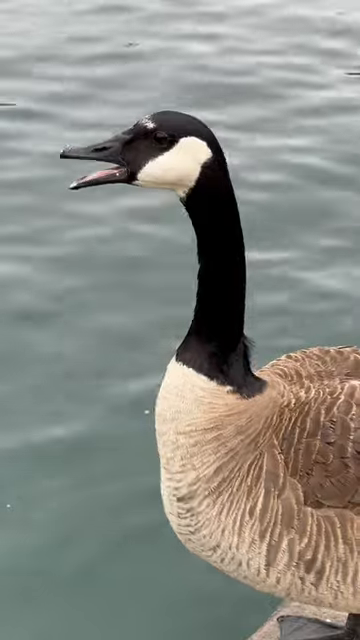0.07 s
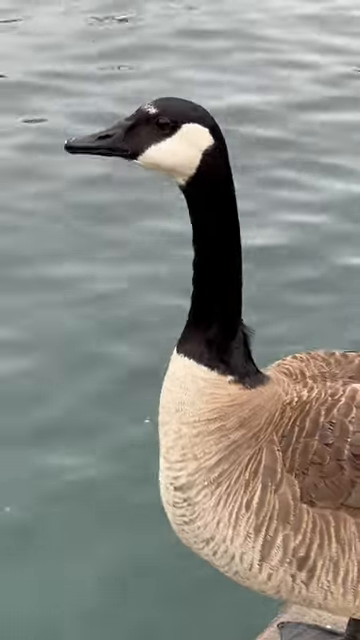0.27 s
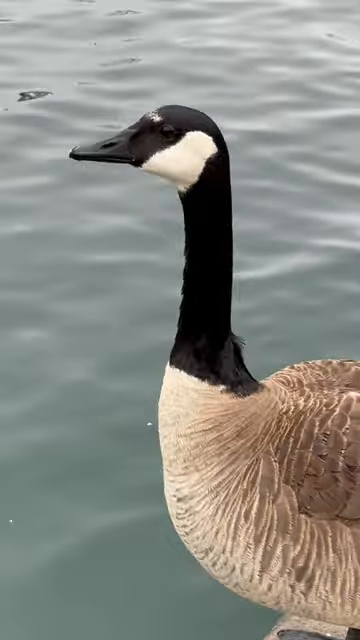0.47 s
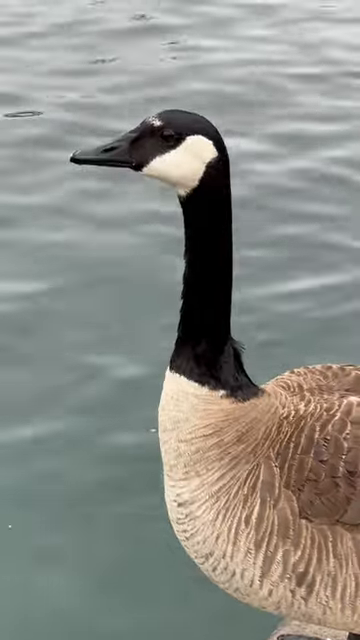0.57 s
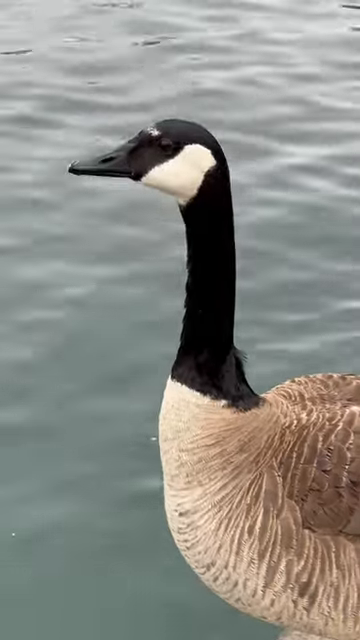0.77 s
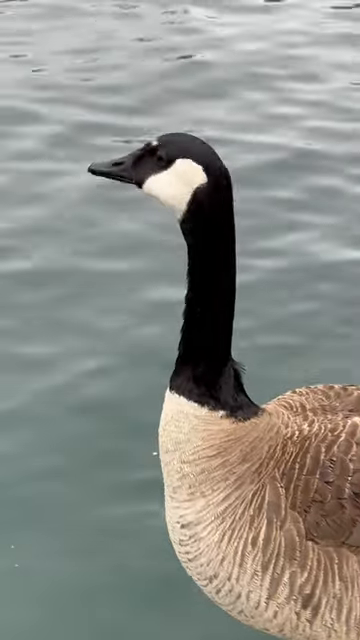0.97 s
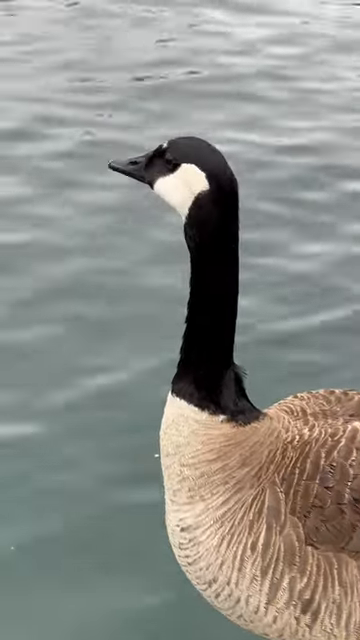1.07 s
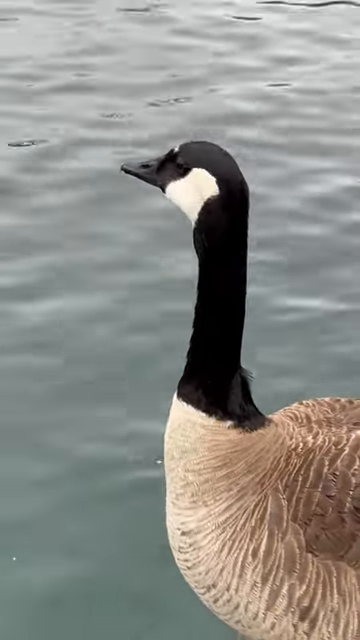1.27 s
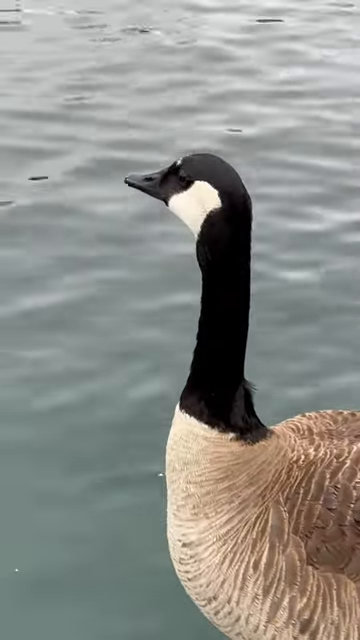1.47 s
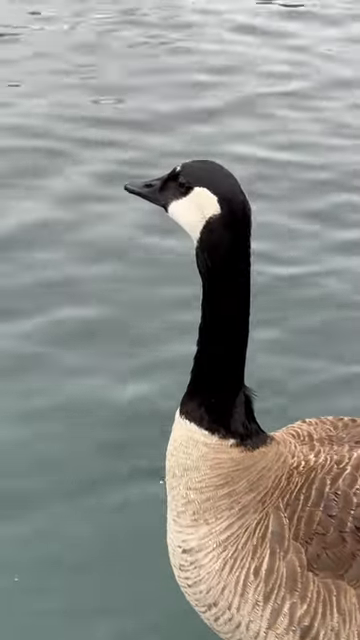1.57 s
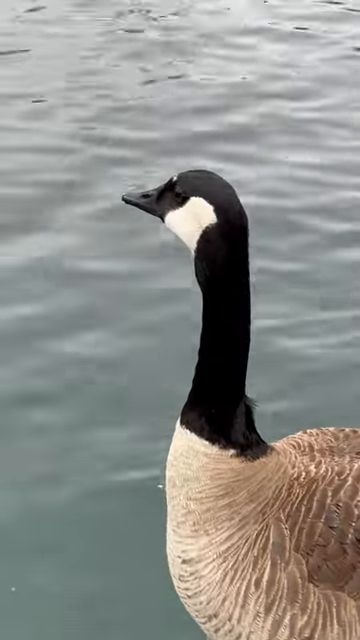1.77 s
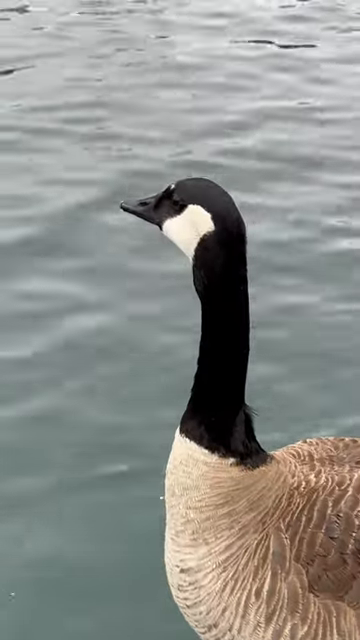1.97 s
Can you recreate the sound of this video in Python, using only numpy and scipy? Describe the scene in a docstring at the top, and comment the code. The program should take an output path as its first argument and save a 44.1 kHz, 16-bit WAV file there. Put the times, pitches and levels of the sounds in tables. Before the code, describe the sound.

Abrupt start inside a loud, buzzing two-toned goose honk that falls and stops within a third of a second, then quiet water, a faint low hum, tiny drips and five small rising-and-falling peeps, outdoors, close microphone.

```python
"""A goose's loud honk, already under way: a large bird close by at a pond's edge, in nearly central stereo.
The two sides of its voice box sound at two pitches, as coupled oscillators driving a resonant windpipe.
Filtered noise makes lapping water and far traffic rumble; a low hum of wandering pitch swells and sags.
A faint whistling tone, a splash and a ringing are brief bands of noise; small drips are short decaying tones.
Five arched peeps are built from partials and wheezing noise."""
import sys
import numpy as np
from scipy import signal
from scipy.fft import rfft, irfft, next_fast_len
from scipy.io import wavfile
from scipy.ndimage import uniform_filter1d

SR = 44100
rng = np.random.default_rng(int(sys.argv[2]) if len(sys.argv) > 2 else 0)


def transcribe(signal):
    """Save signal, clipped to [-1, 1], as a 16-bit WAV file at the path in sys.argv[1]."""
    frames = np.atleast_2d(signal).T
    limited = np.clip(frames, -1, 1)
    pcm = np.round(limited * 32767).astype(np.int16)
    wavfile.write(sys.argv[1], SR, pcm)


def convert_level_to_amplitude(level_db):
    """Map a level in decibels to its linear amplitude factor."""
    exponent = np.asarray(level_db, float) / 20
    return 10 ** exponent


N = 88420  # samples, about two seconds

# Course of the honk: time_s, low_side_hz, high_side_hz, level_db (gain on tones and voice), roughness (0 to 1)
HONK_COURSE = [(.03, 456, 590, -16, .35), (.07, 453, 586, -15, .4), (.12, 454, 581, -13, .25),
               (.17, 455, 578, -12, .2), (.22, 450, 572, -12, .2), (.245, 437, 550, -14, .2),
               (.262, 416, 522, -19, .2), (.28, 385, 490, -29, .1), (.3, 345, 440, -38, .1),
               (.32, 325, 420, -70, .1)]
# Clear tones of the coupled sides: (multiple of low pitch, multiple of high pitch): level_db, before flutter
SIDE_TONES = {(1, 0): -4, (0, 1): -9.5, (2, 0): -2.1, (1, 1): -8, (0, 2): -10, (-1, 1): -19.5, (-1, 2): -18, (-2, 3): -13.5, (-1, 3): -14.5, (3, 0): -18, (-2, 4): -9.5, (2, 1): -11.5, (-2, 5): -18.5}
# Windpipe resonances: centre_hz, width_hz, gain_db
WINDPIPE = [(510, 98, -9), (1003, 193, 1.5), (1160, 242, -1), (1430, 240, -6.5), (1980, 130, -9.5),
            (2319, 63, -7), (2843, 138, -12.5), (3250, 130, -15), (3790, 128, -15.5), (4230, 66, -16),
            (4630, 85, -15.5), (5520, 780, -25.5), (6900, 790, -47), (8800, 2200, -52.5)]
# Diffuse echo from banks and water: frequency_hz, t60_s
SHORE_DECAY = [(200, 0.47), (2000, 0.084), (8000, 0.078)]
# Lapping of the water over time: time_s, level_db (before a fixed 4 dB lift)
WATER_COURSE = [(.3, -42), (.45, -40), (.7, -41), (.95, -41), (1.15, -43), (1.5, -40.5), (2, -41)]
# Colour of the water's wash: frequency_hz, relative_db
WASH_COLOUR = [(90, -25), (150, -4), (230, -3), (400, -8.5), (900, -12), (1850, -21.5), (3400, -28),
               (4900, -39.5), (6000, -38.5), (7600, -34.5), (10300, -41), (11200, -90)]
# Far traffic over time: time_s, level_db
TRAFFIC_COURSE = [(.04, -32), (.4, -36.5), (.8, -36.5), (1.1, -39.5), (1.3, -37), (1.6, -36.5), (2, -40)]
# Colour of the far traffic: frequency_hz, relative_db
TRAFFIC_COLOUR = [(20, -46.5), (34, -9), (70, -2), (87, 2.5), (107, 4), (124, -7), (144, -1), (178, -10.5),
                  (220, -7), (290, -23), (480, -120)]
# Course of the hum: time_s, pitch_hz, level_db (of its main tone)
HUM_COURSE = [(0.178, 230, -40.5), (.28, 229.5, -36), (.4, 227.6, -32.5), (0.516, 231.5, -30.5),
              (.55, 210.8, -36.5), (.59, 229.7, -38.5), (.7, 216.4, -44.5)]
# Brief bands of noise (a faint whistling tone, a splash, a ringing at the last peep):
# full_from_s, length_s (half held, a third for each fade), level_db, centre_hz
BRIEF_BANDS = [(0.456, 0.041, -49.5, 1830), (0.943, 0.14, -43, 1560), (1.852, 0.1, -48.5, 1707)]
# Bandwidth of each brief band: width (natural log of frequency ratio)
BRIEF_BAND_WIDTHS = [0.062, 0.54, 0.034]
# Small drips: start_s, peak_db, pitch_hz, cycles (the swell peaks after half of them)
DRIP_LIST = [(.659, -48, 8000, 5), (1.068, -48, 7400, 3), (1.473, -41, 10000, 3), (1.484, -44, 6100, 9),
             (1.638, -36, 8500, 2), (1.96, -37, 7500, 1.5), (1.975, -43, 9800, 6)]
# Pitch arch of each peep, one list per peep: time_s, pitch_hz
PEEP_ARCHES = [
    [(.738, 1250), (.77, 1740), (.80, 1557), (.845, 1175)],
    [(.985, 1039), (1.005, 1328), (1.02, 1658), (1.033, 2020), (1.066, 2047), (1.082, 1636), (1.1, 1330),
     (1.12, 1173)],
    [(1.22, 950), (1.26, 1450), (1.278, 1706), (1.295, 1745), (1.312, 1430), (1.37, 944)],
    [(1.48, 925), (1.52, 1568), (1.54, 1840), (1.58, 1600), (1.592, 1636), (1.635, 1090)],
    [(1.765, 868), (1.8, 1420), (1.818, 1660), (1.834, 1706), (1.85, 1460), (1.89, 895)],
]
# Strength of each peep's parts, before throat and beak colouring:
# fundamental_db, second_db, fourth_db, fifth_and_sixth_db, wheeze_db (at the top of the arch)
PEEP_LEVELS = [(-49, -58, -76, -74, -57), (-42, -54, -60, -78, -56), (-39, -53, -50, -70, -57),
               (-38, -55, -51, -49, -48), (-41, -50, -55, -51, -48)]
# Throat colour on the first two partials: frequency_hz, gain_db
THROAT_COLOUR = [(1480, -13), (1620, 1.5), (1780, 7), (1900, -8), (2020, 4), (2300, 2.5), (2600, 7),
                 (2950, 6), (3300, 6.5), (4100, 1.5)]
# Beak colour on the fourth to sixth partials: frequency_hz, gain_db
BEAK_COLOUR = [(5700, -40), (6300, -6), (7000, 0), (7800, -14), (8500, 0), (9200, -2), (10000, -30)]
# Colour of the peeps' wheeze: frequency_hz, relative_db
WHEEZE_COLOUR = [(5200, -40), (6200, -7), (7000, -2), (7700, -6), (8700, 0), (9600, -4), (10400, -30),
                 (11200, -120)]
# Side signal, relative to the middle: frequency_hz, level_db
SIDE_COLOUR = [(120, -40), (300, -19), (1700, -21), (2100, -60), (4300, -60), (4700, -2), (5300, -60),
               (6300, -50), (7000, -3), (11000, 0)]
# Colour of the hiss that is opposite in left and right: frequency_hz, relative_db
SHEEN_COLOUR = [(6800, -51), (7600, -8.5), (11000, 2.5), (15500, -11.5), (16000, -59.5)]


def unit(x):
    """Scales to an rms of 1."""
    return x / np.sqrt(np.mean(x ** 2) + 1e-20)


def along(points, hz):
    """Reads (Hz, value) points on a log frequency axis."""
    f, v = np.transpose(points)
    return np.interp(np.log(hz + 1), np.log(f + 1), v)


def curves(rows):
    """One value per sample for each column after the time."""
    s, *cols = np.transpose(rows)
    return [np.interp(np.arange(N) / SR, s, c) for c in cols]


def window(t0, t1, fade_s):
    """One inside the span, fading outside both ends."""
    return np.interp(np.arange(N) / SR, [t0 - fade_s, t0, t1, t1 + fade_s], [0, 1, 1, 0])


def wobble(rate):
    """A random curve joining normal-distributed knots, rate knots a second."""
    knots = int(N * rate / SR) + 2
    return np.interp(np.arange(N) * rate / SR, np.arange(knots), rng.standard_normal(knots))


def phase(hz):
    """Running phase in radians of a moving pitch."""
    return 2 * np.pi * np.cumsum(hz) / SR


def filtered(x, response):
    """Passes x through a complex response of frequency."""
    m = next_fast_len(N + SR // 2)
    return irfft(rfft(x, m) * response(np.fft.rfftfreq(m, 1 / SR)), m)[..., :N]


def rush(spectrum, patchy_db):
    """Coloured noise of rms 1, with random patches of gain in time and frequency."""
    z = signal.stft(rng.standard_normal(N), nperseg=512)[2]
    field = uniform_filter1d(uniform_filter1d(rng.standard_normal(z.shape), 5, 0), 10, 1)
    x = signal.istft(z * convert_level_to_amplitude(patchy_db * unit(field)), nperseg=512)[1][:N]
    return unit(filtered(x, lambda hz: convert_level_to_amplitude(along(spectrum, hz))))


def pulse_train(p, sharpness):
    """One smooth pulse per turn of phase, narrower as sharpness nears 1."""
    return (1 - sharpness ** 2) / (1 + sharpness ** 2 - 2 * sharpness * np.cos(p))


def windpipe(f):
    """Sum of resonances of alternating sign, under a steep upper limit."""
    total = 0
    for k, (centre, width, gain_db) in enumerate(WINDPIPE):
        resonance = 1j * f * width / (centre ** 2 - f ** 2 + 1j * f * width)
        total = total + (-1) ** k * convert_level_to_amplitude(gain_db) * resonance
    top_hz = 10400
    return total / (1 + (f / top_hz) ** 20)


def side_tones(a, b, rough, coupled):
    """Clear tones at sums and differences of the two pitches, as coupled oscillators make."""
    flutter_db, third_rise_db = 3.2, 16
    half_beat = .7  # every other beat is stronger
    total = np.zeros(N)
    for (m, n), level_db in SIDE_TONES.items():
        if (m, n) == (1, 0):
            remaining = 1
        elif (m, n) == (3, 0):
            remaining = convert_level_to_amplitude(third_rise_db * (1 - coupled))  # left ringing at the end
        else:
            remaining = coupled
        tone = np.sin(m * a + n * b + rng.uniform(0, 6.78))
        total += convert_level_to_amplitude(level_db + flutter_db * wobble(38.4)) * tone * remaining
    return total * (1 + half_beat * rough * np.cos((b - a) / 2))


def honk_voice(a, b, rough, coupled, closing_s):
    """Puffs of the low side, swayed by the high one, buzz and rasp through the windpipe."""
    low_sharpness, high_sharpness, pull_rad = .9, .2, .45
    pull = pull_rad * coupled * np.sin(b - a)
    pull = pull + pull_rad * rough * coupled * np.sin((b - a) / 2)
    puffs = pulse_train(a + pull, low_sharpness) * pulse_train(b, high_sharpness * coupled)
    clean = unit(filtered(puffs - puffs.mean(), windpipe))

    # the puffs scatter in the folded windpipe: only the phases of a noise tail are used
    smear_s, buzz_above_hz = .02, 1350
    t = np.arange(SR // 20) / SR
    scatter = rng.standard_normal(len(t)) * convert_level_to_amplitude(-60 * t / smear_s)
    smeared = unit(filtered(clean, lambda f: np.exp(1j * np.angle(rfft(scatter, 2 * len(f) - 1)))))
    smeared = filtered(smeared, lambda f: 1 / (1 + (buzz_above_hz / (f + 1)) ** 10))

    tail_db, pulses_stop_s = 10, .28
    tail = convert_level_to_amplitude(tail_db) * clean * window(-1, pulses_stop_s, closing_s)
    buzz = coupled * smeared + (1 - coupled) * tail
    air = unit(filtered(puffs ** 0.16 * rng.standard_normal(N), windpipe))
    buzz_db, rasp_db = -5, -12.5  # the rasp's level holds at a roughness of 0.25
    return convert_level_to_amplitude(buzz_db) * buzz + convert_level_to_amplitude(rasp_db) * np.sqrt(np.abs(rough)) * 2 * air


def honk():
    """The goose close by: two coupled sides give clear tones and puffs of air in the windpipe."""
    low_hz, high_hz, level_db, rough = curves(HONK_COURSE)
    high_stops_s, closing_s = .263, .015  # the high side stops first; the low side's pulses are left
    coupled = window(-1, high_stops_s, closing_s)
    jitter_hz = 5.5  # at full roughness
    a = phase(low_hz + jitter_hz * rough * wobble(150))
    b = phase(high_hz + jitter_hz * rough * wobble(150))
    tones = side_tones(a, b, rough, coupled)
    voice = honk_voice(a, b, rough, coupled, closing_s)

    # the treble dulls as the bill closes
    treble_above_hz, soften_db_per_s = 4870, 30
    treble = filtered(voice, lambda f: 1 / (1 + (treble_above_hz / (f + 1)) ** 8))
    lost = 1 - convert_level_to_amplitude(-soften_db_per_s * np.arange(N) / SR)
    return convert_level_to_amplitude(level_db) * (tones + voice - treble * lost)


def shore(x):
    """Diffuse answer of banks and water: a decaying noise tail, delayed by 300 samples."""
    hz, t, z = signal.stft(rng.standard_normal(SR // 2), SR, nperseg=256)
    decay = convert_level_to_amplitude(-60 * t / along(SHORE_DECAY, hz)[:, None])
    tail = signal.istft(z * decay, SR, nperseg=256)[1]
    return signal.fftconvolve(np.pad(x, (300, 0)), tail / np.linalg.norm(tail))[:N]


def water():
    """Lapping water: a patchy wash of coloured noise with a drifting level."""
    level_db, = curves(WATER_COURSE)
    return convert_level_to_amplitude(level_db + 4 + .8 * wobble(8)) * rush(WASH_COLOUR, patchy_db=1.3)


def rumble():
    """Far traffic: low coloured noise with a lumpy level."""
    level_db, = curves(TRAFFIC_COURSE)
    return convert_level_to_amplitude(level_db + 0.44 * wobble(14.0)) * rush(TRAFFIC_COLOUR, patchy_db=0.0)


def hum():
    """A low hum of wandering pitch, with tones at half and one and a half times that pitch."""
    hz, level_db = curves(HUM_COURSE)
    under_db, over_db = -7, -12.5
    p = phase(hz)
    tone = np.sin(p) + convert_level_to_amplitude(under_db) * np.sin(p / 2) + convert_level_to_amplitude(over_db) * np.sin(3 * p / 2)
    return np.sqrt(2) * convert_level_to_amplitude(level_db) * window(HUM_COURSE[0][0], HUM_COURSE[-1][0], 0.08) * tone


def brief_bands():
    """Brief bands of noise: a faint whistling tone, a splash, and a ringing at the last peep."""
    out = np.zeros(N)
    for (s, length, level_db, centre_hz), width in zip(BRIEF_BANDS, BRIEF_BAND_WIDTHS):
        noise = rng.standard_normal(N)
        band = unit(filtered(noise, lambda f: np.exp(-(np.log((f + 1) / centre_hz) / width) ** 2)))
        out += convert_level_to_amplitude(level_db) * window(s, s + length / 2, length / 3) * band
    return out


def drips():
    """Tiny ticks: each a sine that swells and dies within a few cycles."""
    out, t = np.zeros(N + SR), np.arange(400) / SR
    for start_s, peak_db, hz, cycles in DRIP_LIST:
        u = 2 * t * hz / cycles
        swell = np.e * u * np.exp(-u)  # reaches 1 at u = 1
        out[round(start_s * SR):][:400] += convert_level_to_amplitude(peak_db) * np.sin(2 * np.pi * hz * t) * swell
    return out[:N]


def peeps():
    """Arched whistles: partials coloured by throat and beak, and a wheeze that swells with the pitch."""
    round_s, uneven_db = 0.019, 3
    peak_power = 5  # all partials but the second sound near the top of the arch
    out, hiss = np.zeros(N), rush(WHEEZE_COLOUR, patchy_db=2.5)
    for arch, (*partials_db, wheeze_db) in zip(PEEP_ARCHES, PEEP_LEVELS):
        hz = uniform_filter1d(curves(arch)[0], int(round_s * SR))
        height = hz / hz.max()
        p = phase(hz * (1 + .009 * wobble(300)))
        voice = np.zeros(N)
        for k, level_db in zip((1, 2, 4, 5, 6), [*partials_db, partials_db[-1]]):
            colour_db = along(THROAT_COLOUR if k < 3 else BEAK_COLOUR, k * hz)
            swell = 1 if k == 2 else height ** peak_power
            voice += convert_level_to_amplitude(level_db + colour_db + uneven_db * wobble(50.2)) * np.sin(k * p) * swell
        wheeze = convert_level_to_amplitude(wheeze_db) * height ** 3 * hiss
        out += window(arch[0][0], arch[-1][0], .012) * (np.sqrt(2) * voice + wheeze)
    return out


def stereo(middle):
    """Left and right: the middle plus and minus a side signal, a filtered copy with a faint hiss."""
    # past a quarter turn, so the right is slightly louder below 2 kHz
    low_turn_rad, sheen_db = 1.87, -63.5

    def side_response(hz):
        turn = np.where(hz < 2000, low_turn_rad, np.pi / 2)
        return convert_level_to_amplitude(along(SIDE_COLOUR, hz)) * np.exp(1j * turn)

    side = filtered(middle, side_response) + convert_level_to_amplitude(sheen_db) * rush(SHEEN_COLOUR, patchy_db=2)
    return middle + side * np.array([[1], [-1]])


def scene():
    """The goose, its echo and the pond's edge, as a nearly central stereo sound."""
    goose = honk()
    echo_db = -20.5
    middle = goose + convert_level_to_amplitude(echo_db) * shore(goose)
    middle = middle + water() + rumble() + hum() + brief_bands() + drips() + peeps()
    return stereo(middle)


def band_limit(x):
    """A steep low-pass at the top of the band."""
    return signal.sosfilt(signal.butter(12, 17000, fs=SR, output="sos"), x)


def record(dry):
    """The sound comes in abruptly in mid-honk."""
    start_s, rise_s = .0374, 0.00019
    onset = np.clip((np.arange(N) / SR - start_s) / rise_s, 0, 1)
    return band_limit(dry * onset)


dry = scene()
out = record(dry)
transcribe(out)
```